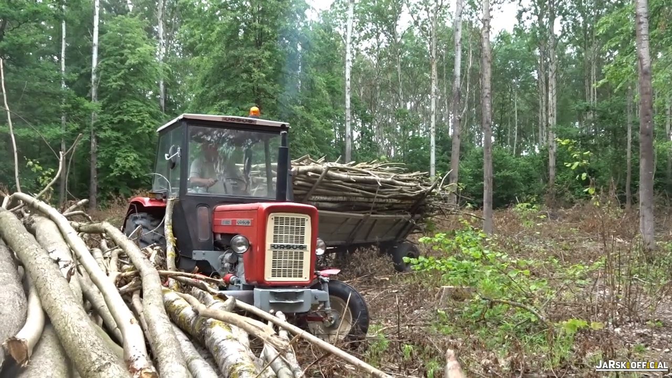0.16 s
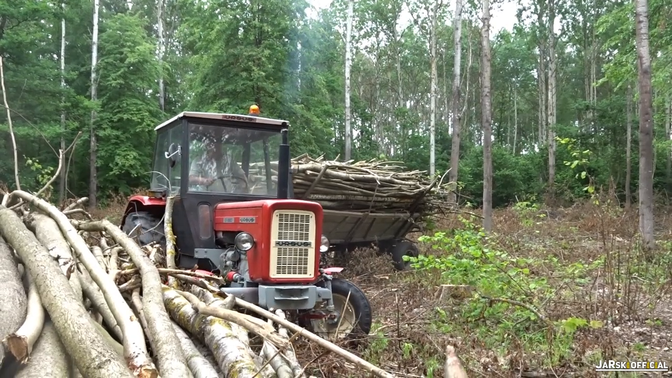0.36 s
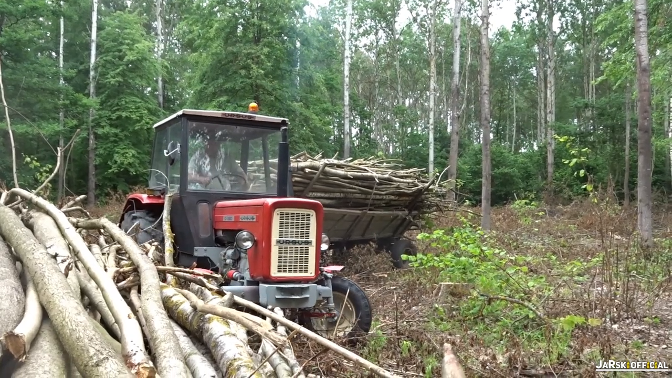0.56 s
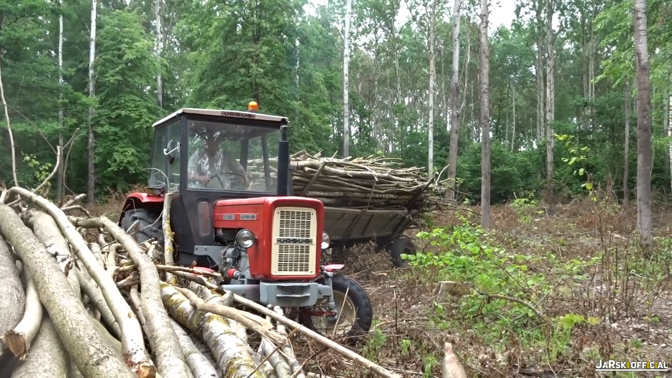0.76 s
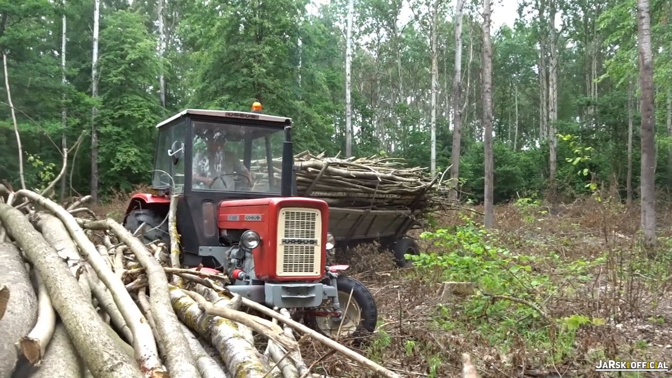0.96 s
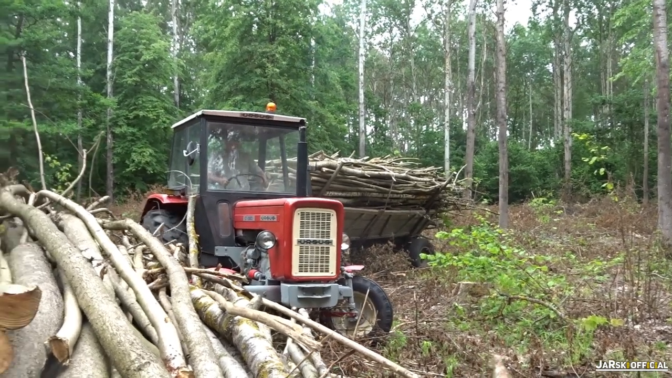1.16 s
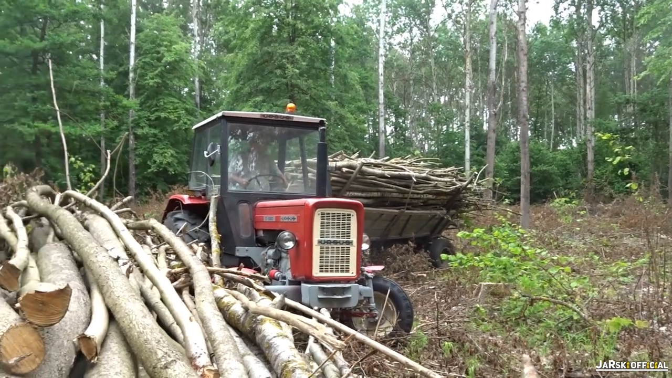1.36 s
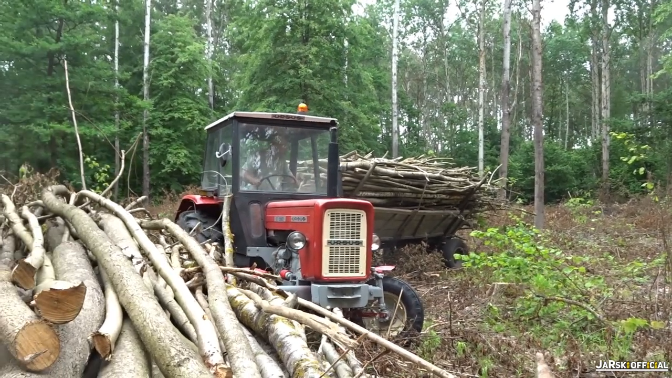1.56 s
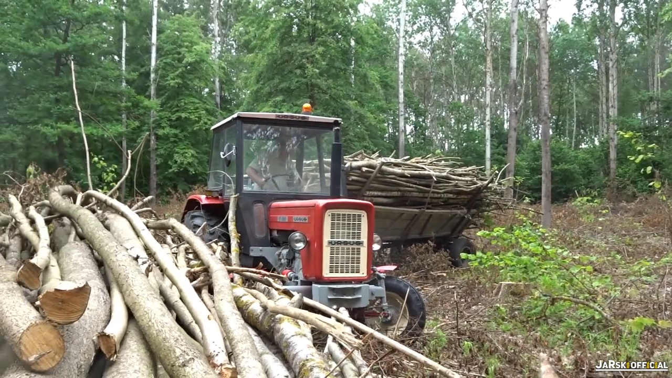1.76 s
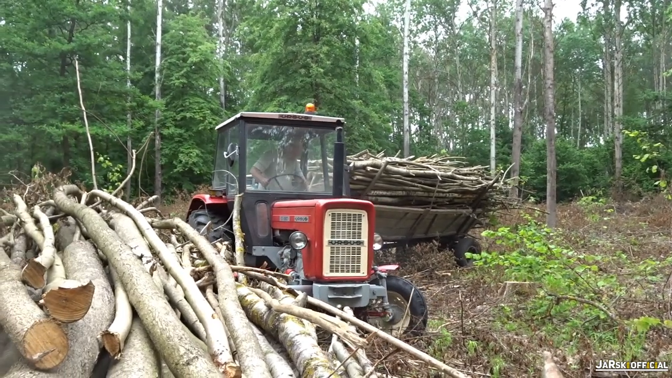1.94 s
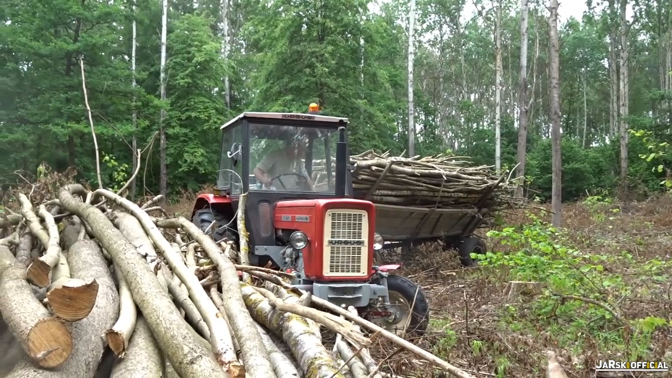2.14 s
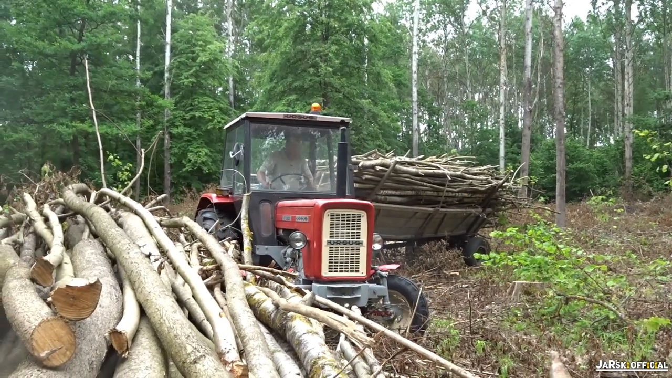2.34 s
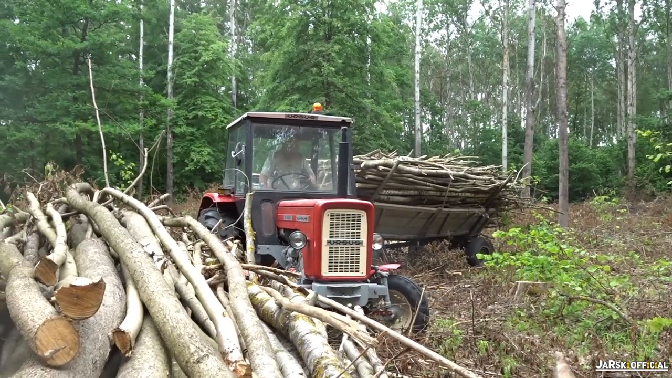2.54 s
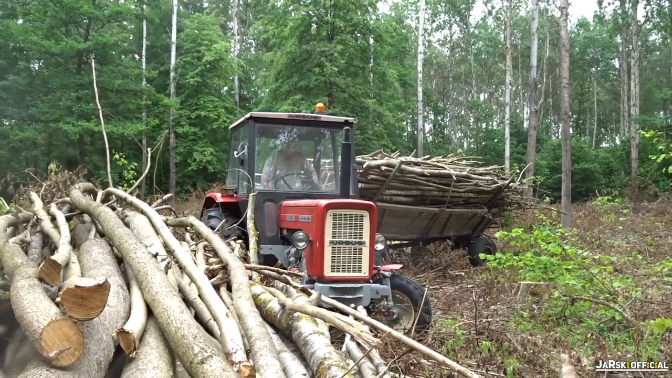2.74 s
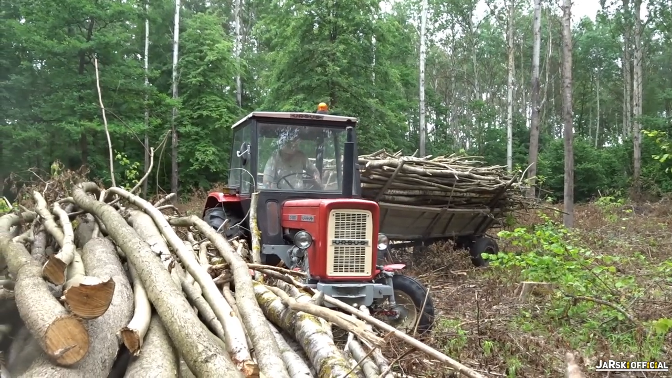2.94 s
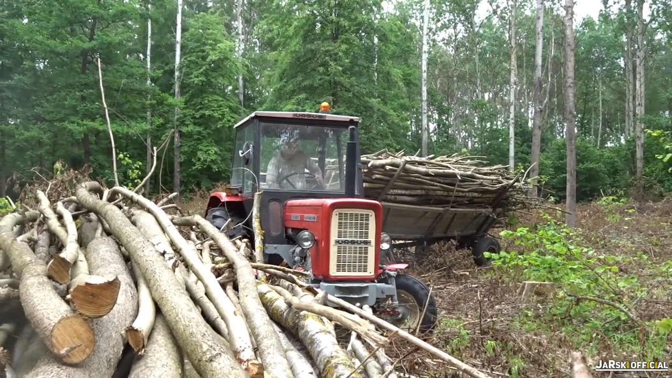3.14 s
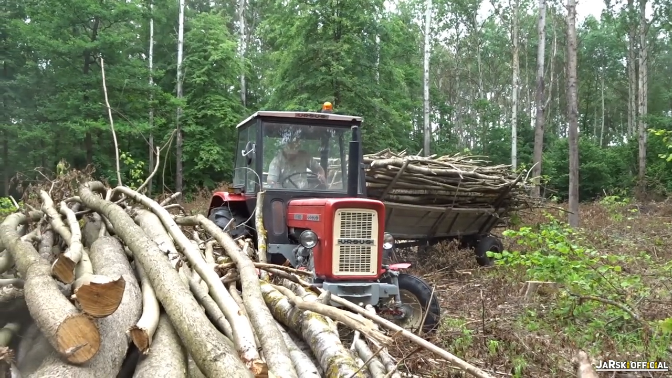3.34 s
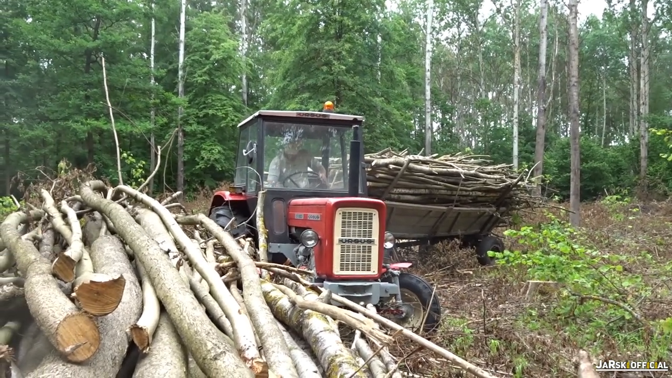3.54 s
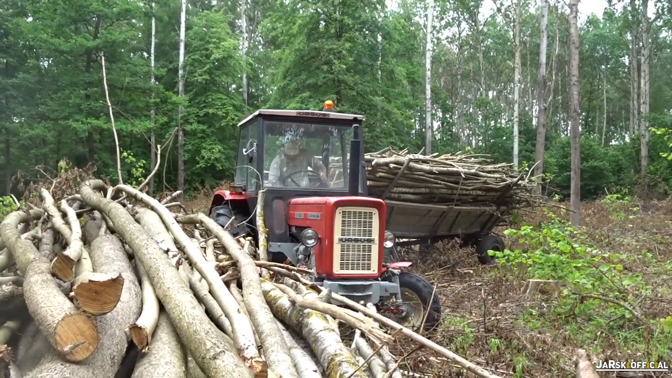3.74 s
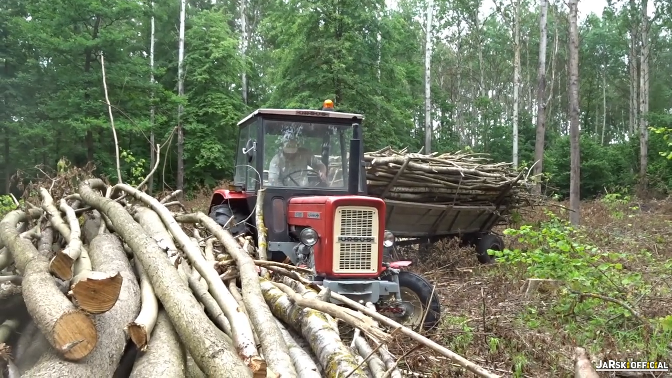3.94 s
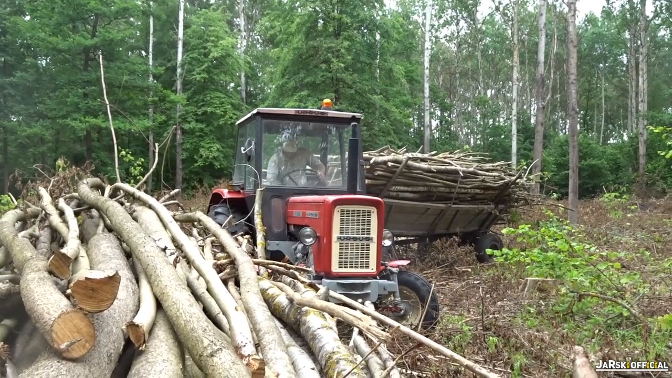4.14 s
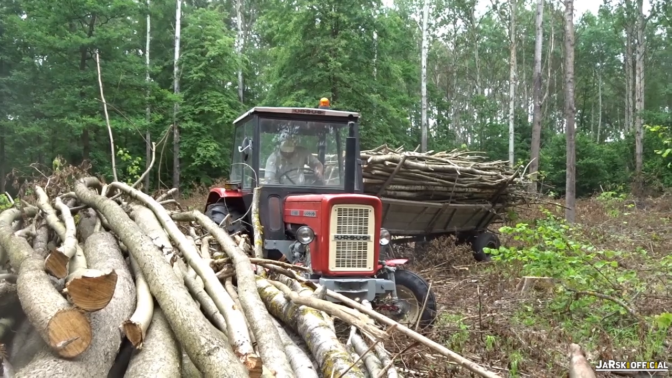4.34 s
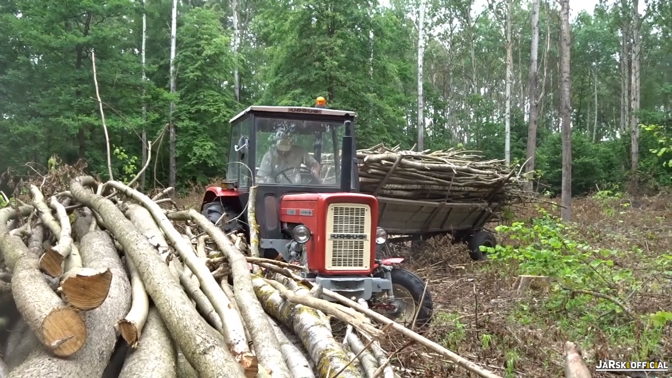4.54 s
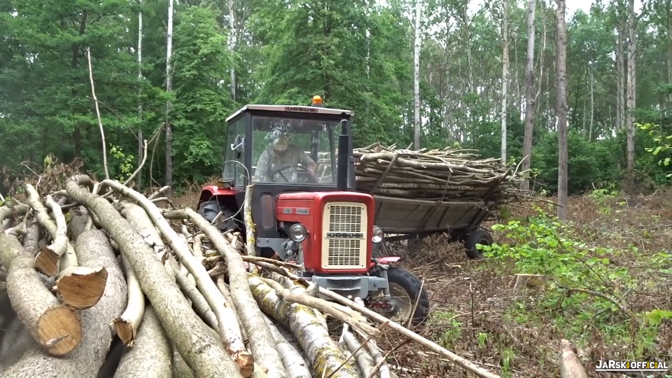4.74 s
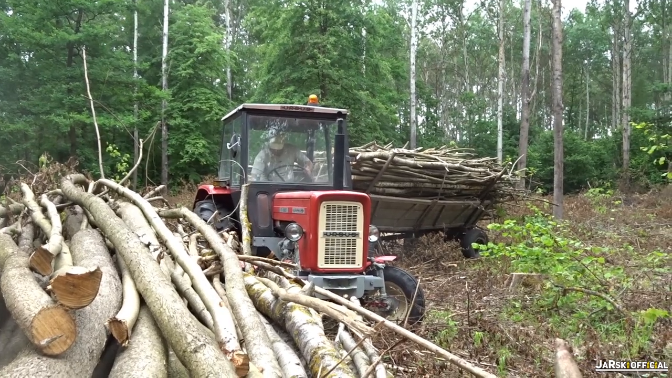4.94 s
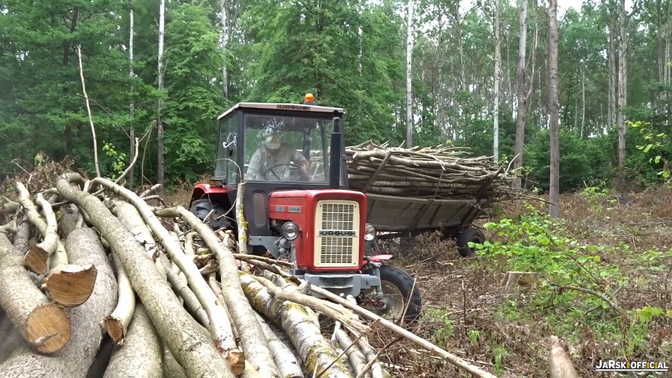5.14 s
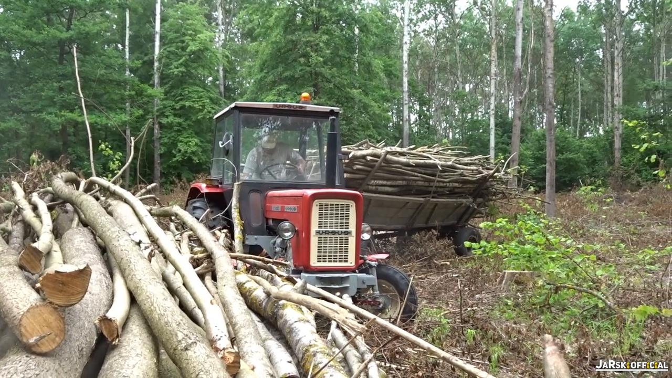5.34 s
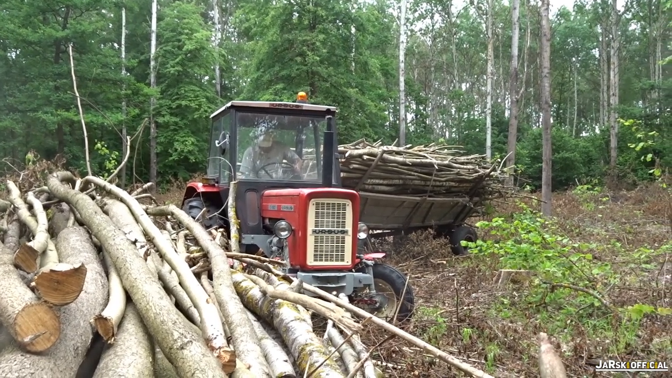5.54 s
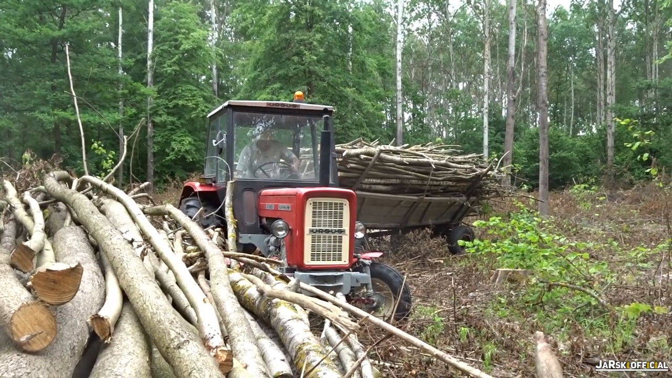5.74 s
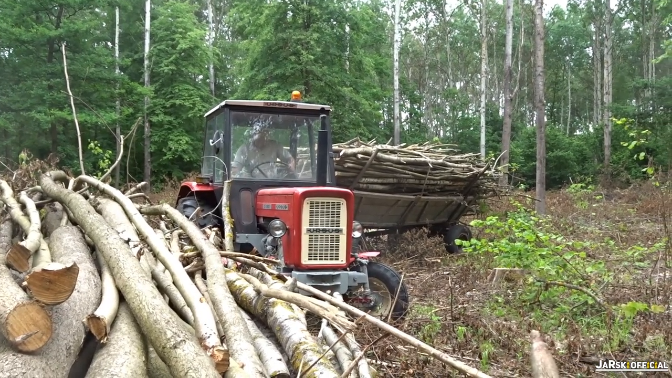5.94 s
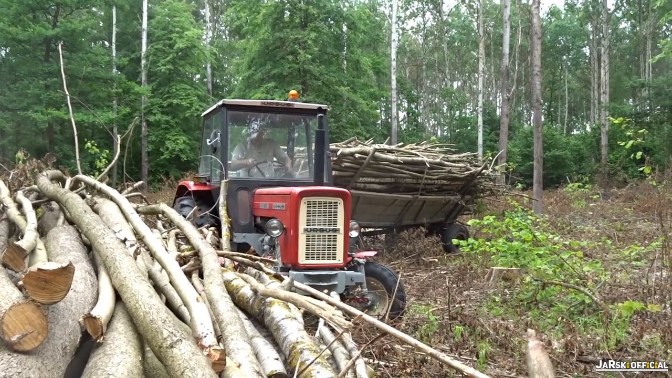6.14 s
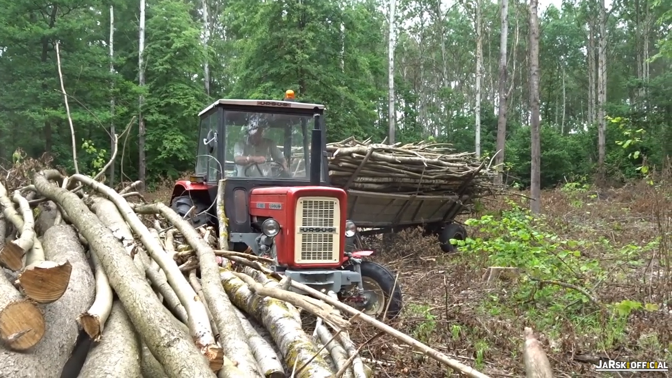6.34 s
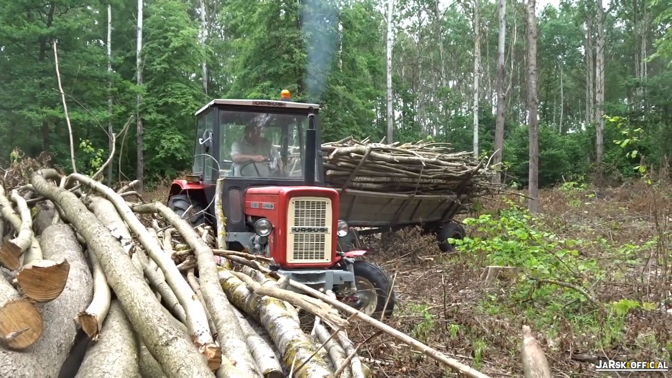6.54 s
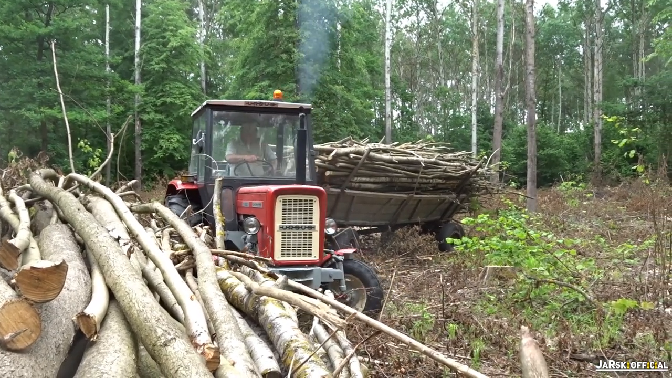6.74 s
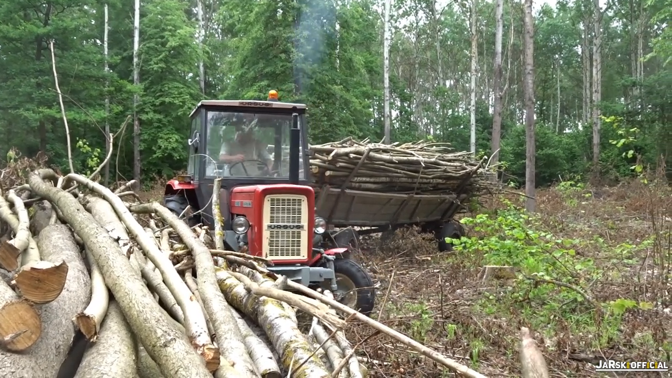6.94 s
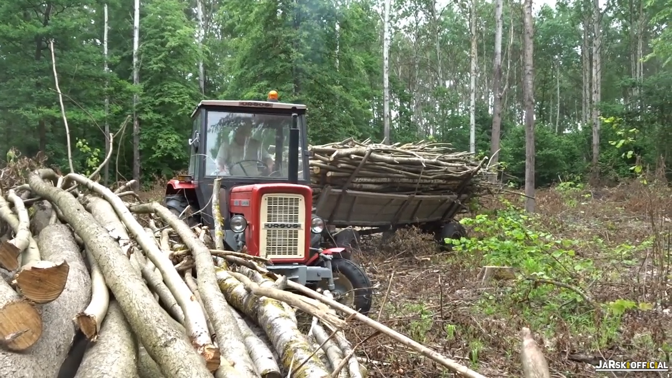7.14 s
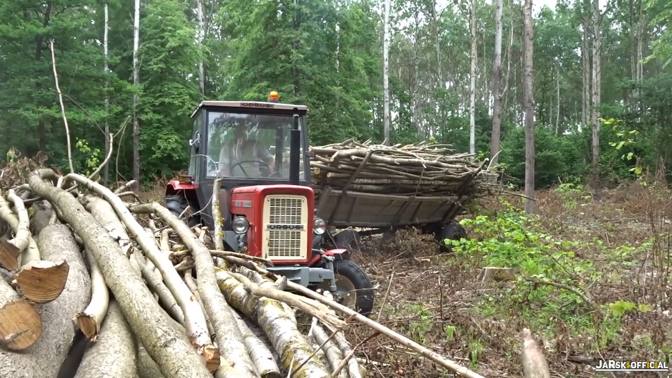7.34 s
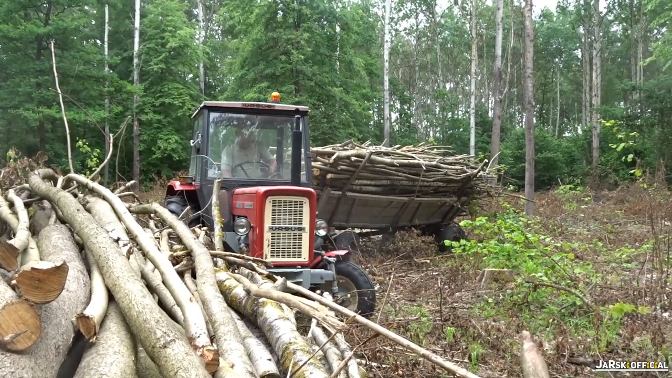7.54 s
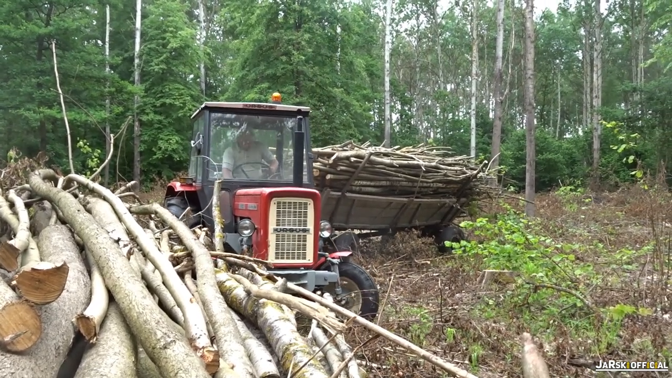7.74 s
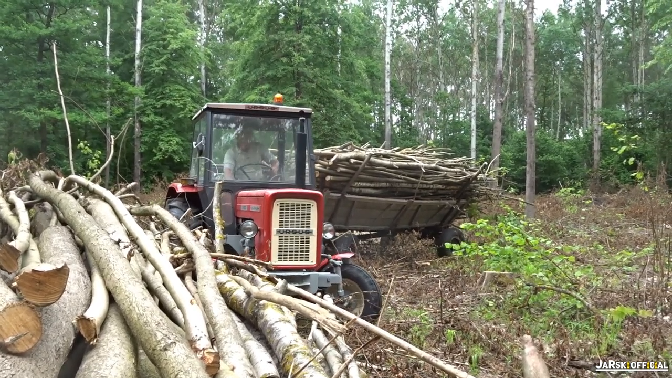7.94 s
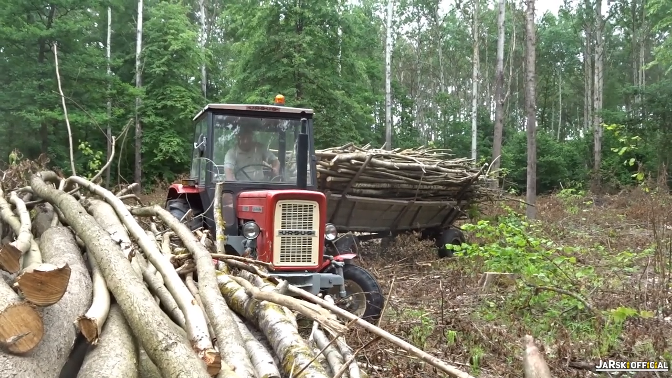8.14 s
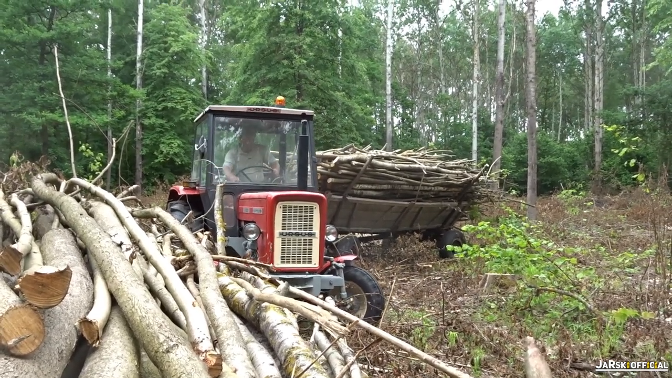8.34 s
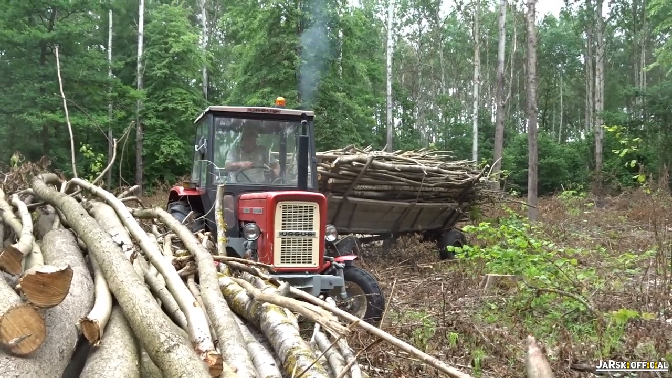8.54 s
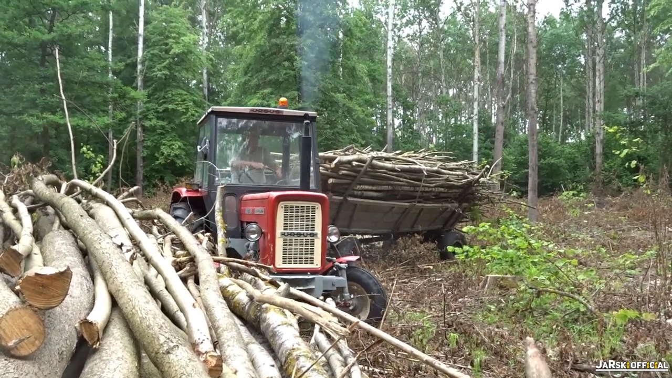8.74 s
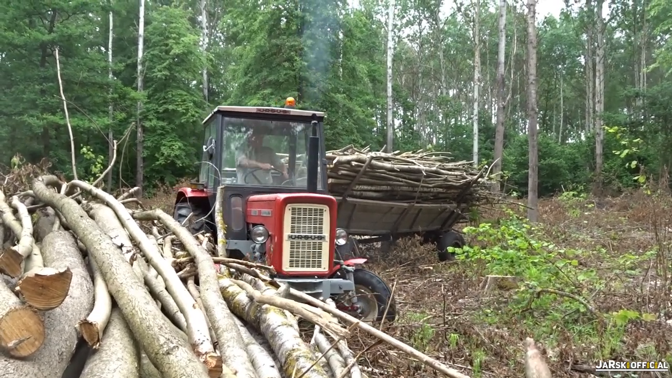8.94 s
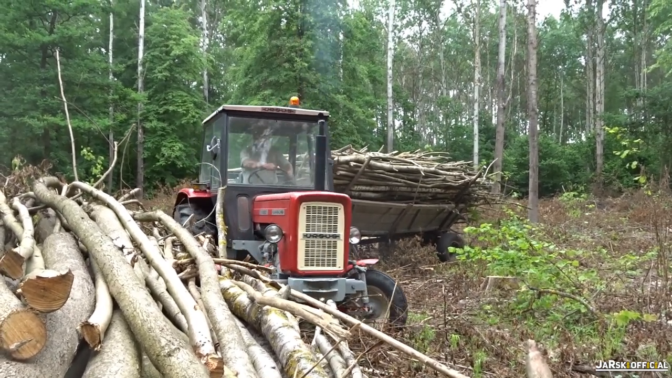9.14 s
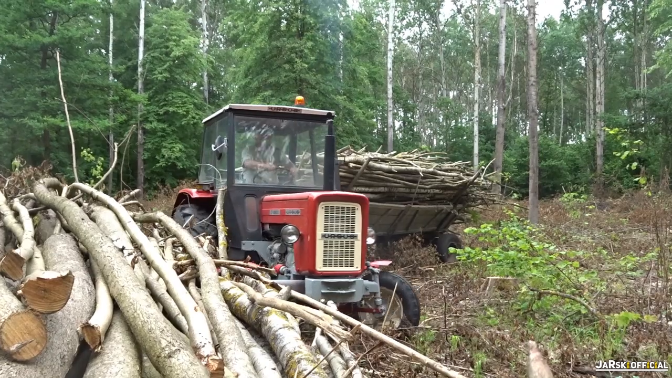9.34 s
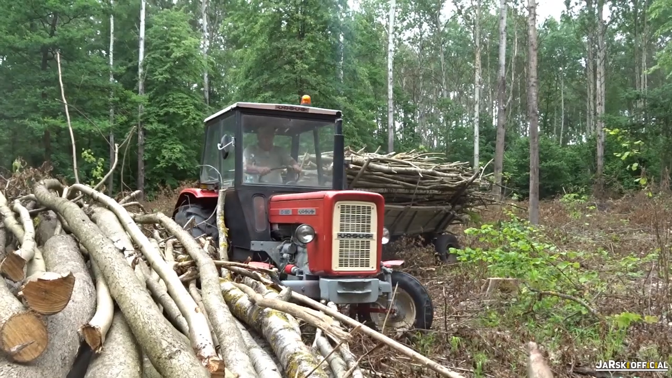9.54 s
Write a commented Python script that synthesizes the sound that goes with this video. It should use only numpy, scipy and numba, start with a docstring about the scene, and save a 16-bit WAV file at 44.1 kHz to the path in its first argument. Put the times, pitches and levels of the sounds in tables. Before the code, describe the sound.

Continuous rough diesel clatter from an old tractor hauling a wagon, heard close outdoors. It begins loud and strained, slackens to separate metallic knocks, climbs unsteadily, bursts into a fast harsh rev past the middle, sags again and finishes under renewed load. Beneath it are a soft exhaust drone and narrow gear howl; above it, a fitful high whine, faint wagon squeaks, panel rattle and a few dry twig cracks. Little echo, treble slightly left.

```python
"""Forest clearing: an old four-cylinder diesel tractor drags a wagon of logs, a few metres away.
Fuel follows the drag of the wagon and the speeding up of the flywheel. Each firing shakes the block by filtered
noise bursts, clanks it by kicked resonators and rings the gas shrilly under full fuel. Gears and valves clatter
as noise, the exhaust hums in sine harmonics, a gearbox howls, a thin whine comes and goes, a loose panel buzzes,
the wagon squeaks, twigs snap as noise clicks, and the trees echo faintly."""
import sys
import numpy as np
from scipy import signal
from scipy.fft import rfft, irfft
from scipy.io import wavfile
from scipy.ndimage import uniform_filter1d, map_coordinates
from numba import njit

SR = 44100
rng = np.random.default_rng(int(sys.argv[2]) if len(sys.argv) > 2 else 0)


def store_wav(level_fs):
    """Save 16-bit WAV to argv[1]."""
    pcm = np.round(np.clip(np.atleast_2d(level_fs), -1, 1) * 32767)
    wavfile.write(sys.argv[1], SR, pcm.T.astype(np.int16))


N = 422478
TIME = np.arange(N) / SR
PART_FUEL = 0.35  # share of full fuel

# Unevenness of the cylinders under light fuel, in firing order.
# Each row: knock in dB, flame ring in dB.
CYLINDERS = [(-7.5, -5.5), (4.5, 6.5), (9.5, 3.5), (5.5, 2)]
# Resonances of block, bonnet and cab. Each row: centre in Hz, width in Hz, boost in dB.
BODY = [(493, 80, 5.5), (579, 75, 4), (736, 145, 3.5), (1045, 168, 11.5), (1153, 220, 7.5),
        (1330, 46, -0.5), (1554, 324, 12.5), (2056, 195, 8.5), (2545, 550, 7), (3093, 140, 5.5),
        (3200, 110, 0.5), (3554, 98, 8)]
# Modes of the loose panel. Each row: centre in Hz, width in Hz, then level in dB for each of the four cylinders.
PANEL_MODES = [(3840, 160, -2, -22, -9, -12), (4050, 78, -5, -12, -11, -5), (4380, 81, -21, -15, -1, -15),
               (4460, 190, -16, -17, -15, -19)]


def undb(db):
    """Decibels to gain."""
    return 10 ** (np.asarray(db) / 20)


def follow(table, control):
    """Columns of a table, interpolated at the value of a control."""
    key, *columns = np.transpose(table)
    return [np.interp(control, key, c) for c in columns]


def curve(table):
    """Columns of a table, joined by straight lines in time."""
    return follow(table, TIME)


def unit(x):
    """Scale to rms 1."""
    return x / np.sqrt(np.mean(x ** 2))


def walk(rate_hz):
    """Slow random signal of rms near 1."""
    k = int(SR / rate_hz)
    steps = np.repeat(rng.standard_normal(N // k + 1), k)
    smooth = uniform_filter1d(uniform_filter1d(steps, k), k)
    return unit(smooth[:N])


def lag(x, lag_s):
    """One-pole inertia, started at the first value."""
    keep = np.exp(-1 / (lag_s * SR))
    return x[0] + signal.lfilter([1 - keep], [1, -keep], x - x[0])


def colour(x, spectrum, modes=(), size=4096):
    """Minimum-phase filter: a smooth spectrum (Hz, dB) with resonances standing on it."""
    f = np.maximum(np.arange(size // 2 + 1) * SR / size, 1)
    hz, db = np.transpose(spectrum)
    gain_db = np.interp(np.log(f), np.log(hz), db)
    gain_db = gain_db + sum(d / (1 + (2 * (f - c) / w) ** 2) for c, w, d in modes)
    # folding the cepstrum makes the response causal
    cepstrum = irfft(np.log(undb(gain_db)))[:size // 2]
    cepstrum[1:] *= 2
    response = irfft(np.exp(rfft(cepstrum, size)))
    return signal.oaconvolve(np.atleast_2d(x), response[None], axes=1)[:, :N]


@njit
def resonator(x, hz, width_hz):
    """State-variable band-pass with a moving centre."""
    y, band, low = np.empty(len(x)), 0., 0.
    for i in range(len(x)):
        g, k = np.tan(np.pi * hz[i] / SR), width_hz / hz[i]
        v = (band + g * (x[i] - low)) / (1 + g * (g + k))
        band, low, y[i] = 2 * v - band, low + 2 * g * v, k * v
    return y


def impacts(spread_db, size=16):
    """Dense tiny blows: mid and side noise sharing one uneven force."""
    force = np.repeat(undb(spread_db * rng.standard_normal(N // size + 1)), size)[:N]
    return unit(force * rng.standard_normal((2, N)))


def bursts(times_s, sizes, rise_s, decay_s):
    """Unit-rms envelope of blows that swell up to their moment and die away."""
    kicks = np.zeros(N)
    np.add.at(kicks, np.clip((times_s * SR).astype(int), 0, N - 1), sizes)
    t = np.arange(-SR // 20, SR // 20 + 1) / SR
    shape = np.exp(-np.abs(t / np.where(t < 0, rise_s, decay_s)) ** 1.5)
    return unit(signal.oaconvolve(kicks, shape, mode="same"))


def governor(rate, load):
    """Fuel, 0 to 1: what the wagon takes plus what speeds up the flywheel, smoothed."""
    spin_up_hz_per_s, fuel_lag_s = 41.9, 0.027  # gain in firing rate of the free engine at full fuel; burn lag
    acceleration = np.gradient(rate) * SR
    return lag(np.clip(load + acceleration / spin_up_hz_per_s, 0, 1), fuel_lag_s)


def light_fuel(fuel):
    """0 at 0.9 of full fuel and above, rising to 1.2 as the engine is barely fed."""
    return np.clip((.9 - fuel) / .62, 0, 1.2)


def firings(strokes):
    """Sample and cylinder of every firing; strokes is the running count of firings."""
    at = np.flatnonzero(np.diff(np.floor(strokes)) > 0)
    return at, np.floor(strokes[at + 1]).astype(int) % len(CYLINDERS)


def accents_db(at):
    """Level offset of the firings nearest to the listed times; most burn harder than their neighbours."""
    # Each row: time in seconds, offset in dB.
    hard_firings = [(.113, 3), (.188, 0.5), (.258, 1), (.957, -0.5), (1.156, 0.5), (2.87, 3.5), (2.995, 6),
                    (3.464, 1), (5.824, 3), (6.419, 1), (6.624, 0.5), (6.812, 3.5), (8.372, 1.5),
                    (9.3, 1.5), (9.502, 0)]
    extra = np.zeros(len(at))
    for s, db in hard_firings:
        extra[np.argmin(np.abs(at / SR - s))] += db
    return extra


def chamber_hz(fuel):
    """Mean pitch of the chamber gas, which full fuel heats: it climbs mostly close to full fuel."""
    cool_hz, hot_hz, heat_lag_s, heat_power = 5720, 8070, 0.065, 3
    heat = np.clip(lag(fuel, heat_lag_s), 0, 1) ** heat_power
    return cool_hz + (hot_hz - cool_hz) * heat


def combustion(strokes, rate, fuel, knock_db, ring_db):
    """Each firing shakes the block and rings the gas; full fuel makes the strokes nearly alike."""
    # Smooth spectra of knock, ring and the bark of fast running. Each row: frequency in Hz, gain in dB.
    knock_spectrum, ring_spectrum, bark_spectrum = [(100, -49), (300, -15.5), (550, 2.5), (900, 1.5),
                                                    (1350, 2), (2500, -4), (3600, -1), (4800, -0.5),
                                                    (7000, -22.5), (11000, -24)], [(1000, -40), (2500, -35), (3500, -3),
                                                                   (4900, -7.5), (6200, 2.5), (8800, 2),
                                                                   (10000, 0), (11000, -10.5)], [(300, -11), (600, 9.5),
                                                                                 (900, 1), (1200, -6.5),
                                                                                 (1550, 13), (1900, 2.5),
                                                                                 (2600, 9.5), (3600, 4.5),
                                                                                 (4500, -12), (5500, -1),
                                                                                 (7000, -35)]
    at, cylinder = firings(strokes)
    knock_chance, time_chance, ring_chance, pitch_chance = rng.standard_normal((len(at), 4)).T
    light = light_fuel(fuel[at])
    knock_bias_db, ring_bias_db = light * np.array(CYLINDERS)[cylinder].T + accents_db(at)
    scatter_db = .4 + 1.3 * light
    times_s = at / SR + 0.00088 * time_chance - .0028

    knock_sizes = undb(knock_bias_db + scatter_db * knock_chance)
    blows = bursts(times_s, knock_sizes, rise_s=.003, decay_s=.0062)
    knock = unit(colour(blows * impacts(spread_db=4.0), knock_spectrum, BODY))

    flame_sizes = undb(ring_bias_db + scatter_db * ring_chance)
    flames = bursts(times_s, flame_sizes, rise_s=0.0022, decay_s=0.0057)
    # every charge rings at its own pitch, which sinks as the gas expands
    stroke = strokes + .25
    own_pitch = np.exp(0.066 * pitch_chance)[np.clip(stroke.astype(int), 0, len(at) - 1)]
    hz = chamber_hz(fuel) * own_pitch * (1.04 - .2 * (stroke % 1))
    gas_tone = np.array([resonator(gas, hz, 600.0) for gas in impacts(spread_db=1)])
    tone = unit(flames * gas_tone)
    ring = unit(colour(flames * impacts(spread_db=0.5), ring_spectrum))
    # the bark grows harder as the engine runs faster
    bark_db = -2 + 0.59 * (rate - 40.5)
    bark = undb(bark_db) * unit(colour(flames * impacts(spread_db=2.0), bark_spectrum))
    shrill = undb(-0.5) * tone + ring + bark
    return undb(knock_db) * knock + undb(ring_db) * shrill


def clatter(strokes, clatter_db, count=24):
    """Valves and gear teeth tap at the same crank angles every four firings, over a bed of loose rattle."""
    # Each row: frequency in Hz, gain in dB.
    clatter_spectrum = [(25, -19), (50, -14), (140, -6), (250, -9), (420, 0.5), (600, 3), (900, -1.5),
                        (1100, -7), (1350, -7), (2500, -6), (4200, -2.5), (6000, -7), (9300, -16.5),
                        (11000, -25)]
    surge_db, patchy_db = 0.35, 0.26
    angles, force = rng.random(count), undb(2 * rng.standard_normal(count))
    cycle = strokes / len(CYLINDERS)
    cycle_starts = np.arange(int(cycle[-1]) + 1)[:, None]
    taps = (cycle_starts + (np.arange(count) + angles) / count).ravel()
    sizes = np.resize(force, len(taps)) * undb(3.9 * rng.standard_normal(len(taps)))
    sizes = sizes * (taps < cycle[-1])
    tapping = bursts(np.interp(taps, cycle, TIME), sizes, rise_s=0.0011, decay_s=0.0062)
    # swells and sinks once per firing
    surge = undb(surge_db * np.cos(2 * np.pi * strokes))
    push = surge * np.sqrt(1 + .8 * tapping ** 2) * impacts(spread_db=1.5)
    rattle = unit(colour(push, clatter_spectrum, BODY))
    # the large panels boom unevenly, the small parts tick on steadily
    boom = signal.sosfiltfilt(signal.butter(2, 1300, fs=SR, output="sos"), rattle)
    return undb(clatter_db) * (rattle + (undb(patchy_db * walk(30)) - 1) * boom)


def exhaust(strokes, rate, fuel, exhaust_db):
    """Harmonics of the gas pulses, shaped by pipe and silencer; their balance follows the fuel."""
    # Each row: multiple of the firing rate, level in dB coasting, under part fuel, under heavy fuel.
    harmonics = [(1, -11, -19, -16), (2, -2, 1, .5), (3, 0, 2.5, -7), (4, -17, -.5, -3), (6, -13, -15, -2)]
    # What pipe and silencer let through. Each row: frequency in Hz, gain in dB.
    pipe = [(30, -26), (45, -2), (60, -4), (85, 1), (98, -2.5), (110, -1.5), (120, -5.5), (131, 0.5),
            (155, -6.5), (195, -6.5), (245, -5.5), (300, -14)]
    heavy_fuel, db_per_hz, cruise_hz = 0.53, 0.36, 40.1
    tones = 0
    for k, *levels_db in harmonics:
        db = np.interp(fuel, [0, PART_FUEL, heavy_fuel], levels_db)
        db = db + follow(pipe, k * rate)[0] + walk(10)
        tones = tones + undb(db) * np.sin(2 * np.pi * (k * strokes + rng.random()))
    return undb(exhaust_db + db_per_hz * (rate - cruise_hz)) * tones


def gearbox():
    """Rough tooth contact excites one narrow resonance of the casing: noise through two band-passes."""
    # Each row: time in seconds, pitch in Hz, level in dB.
    howl = [(0, 574, -39), (.6, 576, -31.5), (1.2, 520, -34), (1.6, 524, -50), (2.3, 525, -67),
            (3.5, 543, -42), (4.5, 544, -38.5), (5.8, 574, -38.5), (6.4, 540, -43), (6.85, 530, -31),
            (7.2, 526, -35.5), (7.8, 527, -34), (8.3, 530, -49), (8.8, 510, -38.5), (9.15, 533, -35.5),
            (9.58, 525, -28)]
    hz, db = curve(howl)
    once = resonator(rng.standard_normal(N), hz, 80.0)
    return undb(db) * unit(resonator(once, hz, 80.0))


def wavering(hz, wobble):
    """Thin unit-rms tone whose pitch will not hold still."""
    return np.sqrt(2) * np.sin(2 * np.pi * np.cumsum(hz * (1 + wobble * walk(150))) / SR)


def whine():
    """Rubbing metal sings fitfully in a few thin tones; now and then the wagon squeaks."""
    # Each row: time in seconds, level in dB.
    loudness = [(0, -41), (1.4, -51), (2.3, -60), (4.5, -61), (4.85, -51), (5.2, -56), (5.7, -50),
                (6.8, -46), (7.3, -42), (7.6, -51), (8.1, -56), (8.5, -69), (8.8, -46), (9.05, -41),
                (9.58, -49)]
    # Each row: frequency in Hz, relative level in dB.
    thin_tones = [(9275, 0), (7806, -7)]
    # Each row: centre time in seconds, frequency in Hz, 1/e half-length in seconds, level in dB.
    squeak_rows = [(0.288, 4320, 0.039, -33), (1.45, 7806, 0.061, -43), (1.98, 1500, .035, -38),
                   (5.6, 4410, 0.15, -41)]
    singing, squeaks = 0, 0
    for hz, db in thin_tones:
        fitful = unit(undb(2.5 * walk(18)))
        singing = singing + undb(db) * fitful * wavering(hz, wobble=.0045)
    for s, hz, length_s, db in squeak_rows:
        swell = np.exp(-((TIME - s) / length_s) ** 2)
        squeaks = squeaks + undb(db) * swell * wavering(hz, wobble=0.00564)
    return undb(curve(loudness)[0]) * singing + squeaks


def clank(strokes, fuel, modes, lead_s=0, force_db=1.65, patchy_db=1.55):
    """Every cylinder strikes the metal at its own spot and moment; a loose rebound colours each clank."""
    # How early each cylinder sets off its clank, in seconds, in firing order.
    cylinder_leads_s = [.0072, .0108, .0072, .006]
    # Shortest and longest rebound delay in seconds.
    rebound_s = (.002, .007)
    drift, rebound_db = .019, -6  # relative pitch sway of the modes; rebound against strike
    at, cylinder = firings(strokes)
    light, force = light_fuel(fuel[at]), force_db * rng.standard_normal(len(at))
    struck = at - SR * (lead_s + np.array(cylinder_leads_s)[cylinder])
    rebounds = struck + SR * rng.uniform(*rebound_s, len(at))
    ringing = 0
    for hz, width_hz, *levels_db in modes:
        even_db = np.mean(levels_db)
        # the cylinders differ less as fuel grows
        size_db = even_db + light * (np.array(levels_db)[cylinder] - even_db)
        sizes = undb(size_db + force + patchy_db * rng.standard_normal(len(at)))
        kicks, centre_hz = np.zeros(N), hz * (1 + drift * walk(25))
        kicks[np.clip(struck.astype(int), 0, N - 1)] = sizes
        kicks[np.clip(rebounds.astype(int), 0, N - 1)] = sizes * undb(rebound_db)
        once = resonator(kicks, centre_hz, 1. * width_hz)
        mode = unit(resonator(once, centre_hz, 1. * width_hz))
        ringing = ringing + np.sqrt(np.mean(sizes ** 2)) * mode
    return ringing


def piston_slap(strokes, slap_db, count=4):
    """A worn piston slaps every four firings, on a new spot each time, so the wall modes vary in strength."""
    # Modes of the cylinder wall. Each row: centre in Hz, width in Hz, level in dB.
    wall = [(670, 160, -1), (1079, 21, 13), (1180, 21, 1), (1615, 99, 7.5), (2070, 53, 5), (2980, 97, -5.5)]
    lead_s, patchy_db = 0.005, 3.0
    times_s = TIME[np.flatnonzero(np.diff(np.floor((strokes + 1) / count)) > 0)]
    ringing = 0
    for hz, width_hz, db in wall:
        sizes = undb(patchy_db * rng.uniform(-0.79, 1, len(times_s)))
        push = bursts(times_s - lead_s, sizes, rise_s=0.0099, decay_s=0.021)
        mode = resonator(push * rng.standard_normal(N), np.full(N, 1. * hz), 1. * width_hz)
        ringing = ringing + undb(db) * unit(mode)
    return undb(slap_db) * unit(colour(ringing, [(300, 4.4), (650, 8.0), (3200, 18.0), (6000, 21.8)])[0])


def panel(strokes, fuel):
    """The firings set a loose bonnet panel ringing, and it chatters softly against its frame."""
    # Each row: time in seconds, mean level in dB.
    loudness = [(1.9, -49.5), (3.2, -40.5), (6, -38), (6.4, -45), (7, -62), (8.3, -60), (8.8, -44)]
    buzz_db, flutter_db = -2, 0.5
    at, cylinder = firings(strokes)
    sizes = undb(np.array(PANEL_MODES)[:, 2:].mean(axis=0))[cylinder]
    shaking = bursts(at / SR - .002, sizes, rise_s=0.0077, decay_s=0.012)
    chatter_spectrum = [(3000, -43), (3900, 5), (4400, 7), (5200, -40)]
    buzz = unit(colour(shaking * impacts(spread_db=6.0), chatter_spectrum)[0])
    ringing = clank(strokes, fuel, PANEL_MODES, lead_s=-.001, force_db=1.5, patchy_db=.8)
    return undb(curve(loudness)[0] + flutter_db * walk(18)) * (ringing + undb(buzz_db) * buzz)


def twigs():
    """Dry wood breaks under the wheels with a very short crack of decaying noise."""
    # Each row: start in seconds, envelope level in dB before colouring.
    snaps = [(.282, -5), (0.687, -10), (7.395, -17), (7.447, -8)]
    decay_s = 0.00055
    cracks = sum(undb(db) * (TIME >= s) * np.exp(-np.abs(TIME - s) / decay_s) for s, db in snaps)
    return colour(cracks * rng.standard_normal(N), [(500, -2.0), (2500, -3), (9000, -12.0)])[0]


def sizzle(fuel, sizzle_db):
    """With the fuel cut, the slack gears sizzle evenly."""
    slack = np.clip(1 - fuel / PART_FUEL, 0, 1)
    spectrum = [(2000, -36), (4500, 3.5), (6500, 3), (9500, 1.5), (11000, -8.5)]
    return slack * undb(sizzle_db) * unit(colour(impacts(spread_db=3), spectrum))


def strikes(blows, modes, lead_s):
    """Single hard blows: the ring of each mode swells for a moment and dies away."""
    out, t = np.zeros(N + SR), TIME[:SR // 10]
    for s, db in blows:
        ring = 0
        chances = rng.standard_normal((len(modes), 3))
        for (hz, width_hz, *levels_db), (force, detune, phase) in zip(modes, chances):
            age = np.pi * width_hz * t
            tone = np.sin(2 * np.pi * (hz * (1 + .012 * detune) * t + phase))
            ring = ring + undb(np.mean(levels_db) + force) * age * np.exp(-age) * tone
        start = int((s - lead_s) * SR)
        out[start:start + len(t)] += undb(db) * ring / np.abs(ring).max()
    return out[:N]


def reflected(x):
    """The treble also bounces off the ground; the detour sways as the tractor rocks, so its colour shifts."""
    bounce_s, sway, bounce_db = .00235, .08, -8  # mean delay, relative sway, strength
    place = (TIME - bounce_s * (1 + sway * walk(1.5))) * SR
    treble = signal.sosfilt(signal.butter(2, 3500, "high", fs=SR, output="sos"), x)
    return x + undb(bounce_db) * np.array([map_coordinates(v, [place], order=3) for v in treble])


def forest(x):
    """Trunks scatter a thin, bright echo to each side: decaying noise tails, independent left and right."""
    t60_s, echo_db, t = .5, -19, TIME[:SR]
    tail = rng.standard_normal((2, SR)) * np.exp(-np.log(1000) * t / t60_s) * (t > .012)
    tail /= np.sqrt(np.sum(tail ** 2, axis=1, keepdims=True))
    bright = colour(x, [(100, -9), (1500, -19), (9000, 13.0)])
    return undb(echo_db) * signal.oaconvolve(bright, tail, axes=1)[:, :N]


def scene():
    """Speed and drag drive the engine, nearly straight ahead; its treble leans a little to the left."""
    # Engine speed. Each row: time in seconds, firings per second.
    speed = [(0.0, 39.88), (0.413, 44.17), (1.174, 45.46), (1.496, 38.92), (2.177, 30.67), (2.682, 29.25),
             (2.956, 32.69), (3.836, 37.3), (4.102, 35.73), (4.755, 38.78), (5.039, 37.01), (5.658, 40.5),
             (6.169, 39.68), (6.43, 42.05), (6.858, 50.76), (7.196, 43.17), (7.599, 38.46), (8.337, 30.02),
             (8.658, 40.53), (8.765, 41.69), (9.139, 38.62), (9.58, 39.96)]
    # Drag of wagon and ground. Each row: time in seconds, share of full fuel needed to hold the speed.
    drag = [(0, 0.64), (.95, 0.65), (1.25, 0.37), (2.1, 0.16), (3.2, 0.22), (3.8, 0.22), (3.97, 0.34),
            (4.15, 0.27), (4.7, 0.31), (4.9, 0.23), (5.1, 0.27), (6.29, 0.4), (6.43, 0.82), (6.9, 0.029),
            (8.35, 0.38), (8.8, 0.72), (8.95, 0.5), (9.3, 0.66), (9.58, 0.67)]
    # Each row: share of full fuel, then in dB: knock, clank, chamber ring, piston slap, exhaust, clatter change.
    by_fuel = [(0, -44, -42.5, -53, -35, -53, -0.5), (.1, -39.5, -38.5, -52.5, -36.5, -52, -1.5),
               (.4, -32.5, -32.5, -40, -38.5, -46, -0.03), (.78, -26.5, -28, -26.5, -35, -44.5, 1.5),
               (1, -33.5, -36, -24.5, -43, -48, -0.5)]
    # Each row: firings per second, then in dB: clatter, sizzle of slack gears, change of knock and clank.
    by_speed = [(28.1, -33, -56, -1), (35.5, -30, -48, 0), (40.15, -28.5, -35.5, 1), (46.2, -27.5, -42, -2),
                (46, -28, -36.5, -5)]
    # Block modes. Each row: centre in Hz, width in Hz, then level in dB per cylinder in firing order.
    clank_modes = [(575, 79, -15, -13, -17, -21), (726, 75, -8.5, -0.5, -7.5, -11),
                   (1070, 73, -4.5, -4.5, -4.5, -1), (1173.5, 66, -3, 0.5, -1.5, -11),
                   (1446, 46, -11.5, -9, -17, -19.5), (1555, 88, -10, -15.5, -28, -7),
                   (2020, 76, -12.5, -15.5, -6, -10), (2444, 84, -19, -9, -7, -10),
                   (3002, 140, -24, -12, -11, -5.5), (3600, 63, -15, -29, -10, -10)]
    # Extra clanks of the block and clinks of the panel. Each row: time in seconds, peak in dB ahead of panning.
    hard_clanks, clinks = [(2.019, -19), (2.143, -22), (2.506, -25), (2.544, -25), (2.674, -19),
                           (3.407, -20), (3.461, -22), (3.574, -15), (3.686, -23), (4.152, -17),
                           (4.505, -12), (4.765, -21), (4.975, -16.5), (5.083, -21), (6.351, -23),
                           (6.751, -17), (8.312, -17), (8.654, -13), (8.702, -14), (8.851, -21),
                           (9.154, -18)], [(2.436, -27), (2.572, -25), (2.84, -24), (3.82, -24),
                                                (8.339, -23), (9.429, -22)]
    # Filter of the side signal. Each row: frequency in Hz, gain in dB.
    width = [(30, -13), (60, -24), (130, -22), (250, -20), (600, -19), (1060, -17.5), (1900, -10),
             (3400, -11), (6000, -6.5), (10600, -11)]
    first_stroke, clatter_load_db = -.634, 5  # firing count at the start; extra clatter under full drag
    side_lag_s = 0.00307  # a nearby reflection brings the metal this much later from the side

    rate, load = curve(speed)[0], curve(drag)[0]
    strokes, fuel = first_stroke + np.cumsum(rate) / SR, governor(rate, load)
    knock_db, clank_db, ring_db, slap_db, exhaust_db, taut_db = follow(by_fuel, fuel)
    clatter_db, sizzle_db, racing_db = follow(by_speed, rate)

    engine = combustion(strokes, rate, fuel, knock_db + racing_db, ring_db)
    engine = engine + clatter(strokes, clatter_db + taut_db + clatter_load_db * load)
    mid, side = reflected(engine + sizzle(fuel, sizzle_db))

    metal = undb(clank_db + racing_db) * clank(strokes, fuel, clank_modes) + panel(strokes, fuel)
    metal = metal + strikes(hard_clanks, clank_modes, lead_s=0.0066)
    metal = metal + strikes(clinks, PANEL_MODES, lead_s=.003)
    mid, side = mid + metal, side + np.roll(metal, int(side_lag_s * SR))

    lean_left = colour(mid, [(2500, -32), (6000, -17)])[0]
    side = colour(side, width)[0] + lean_left
    mid = mid + piston_slap(strokes, slap_db) + exhaust(strokes, rate, fuel, exhaust_db)
    mid = mid + gearbox() + whine() + twigs()
    return np.array([mid + side, mid - side]) + forest(mid)


def record(dry):
    """Round the very highest peaks smoothly, then cut the top steeply."""
    ceiling, top_hz = 0.98, 11170
    rounded = dry / (1 + (dry / ceiling) ** 4) ** .25
    return signal.sosfilt(signal.ellip(8, .2, 45, top_hz, fs=SR, output="sos"), rounded)


dry = scene()
out = record(dry)
store_wav(out)
```